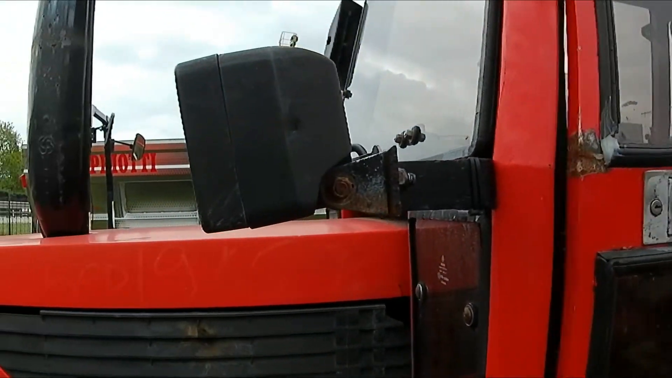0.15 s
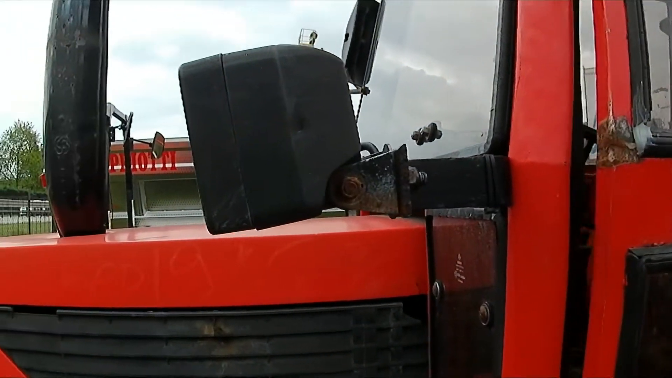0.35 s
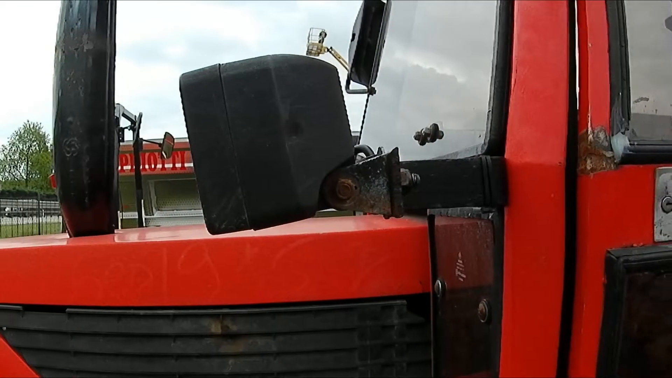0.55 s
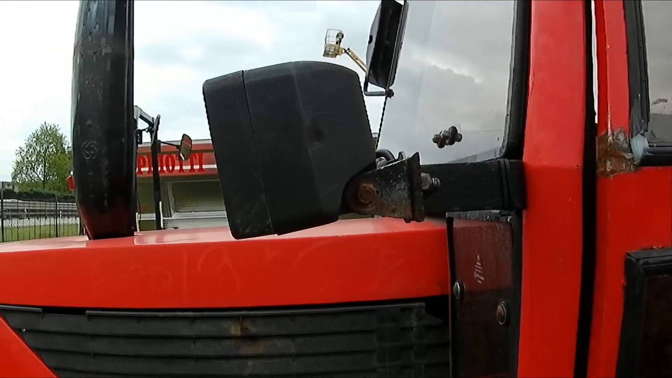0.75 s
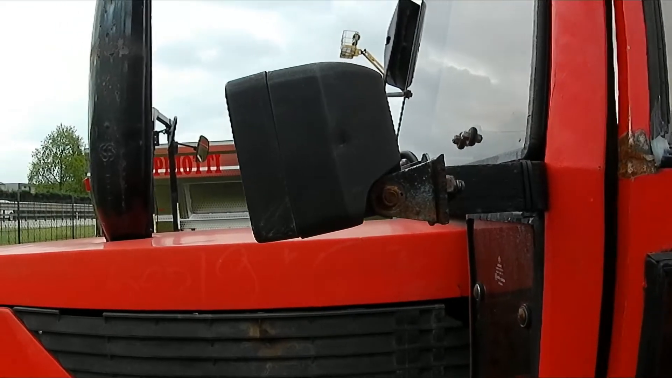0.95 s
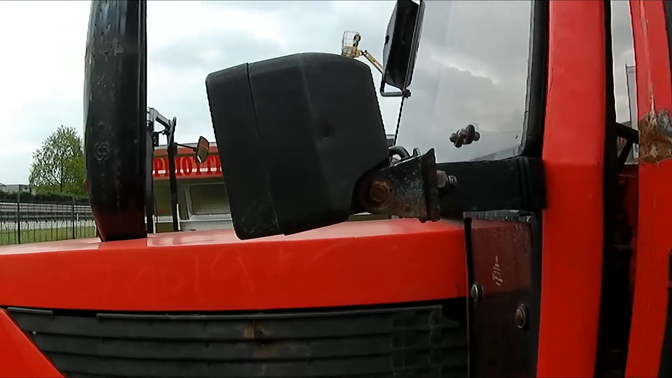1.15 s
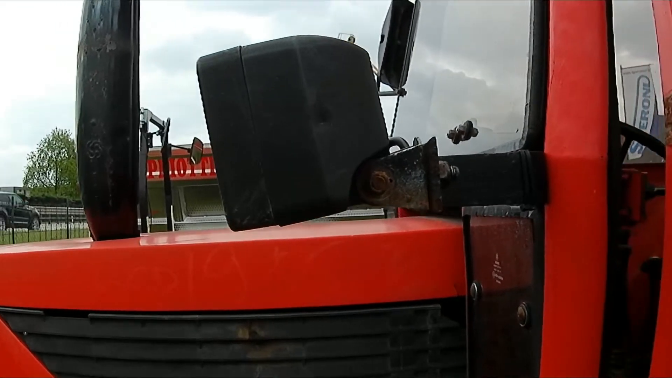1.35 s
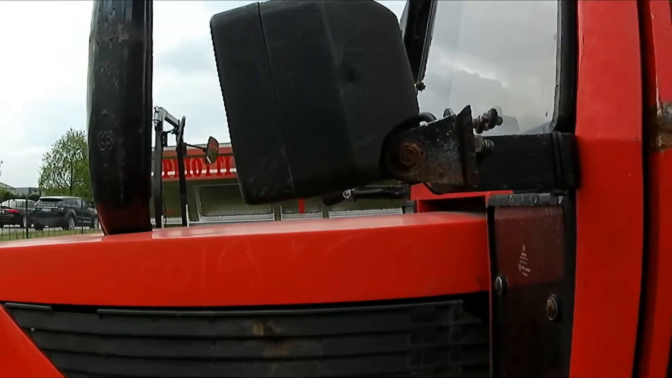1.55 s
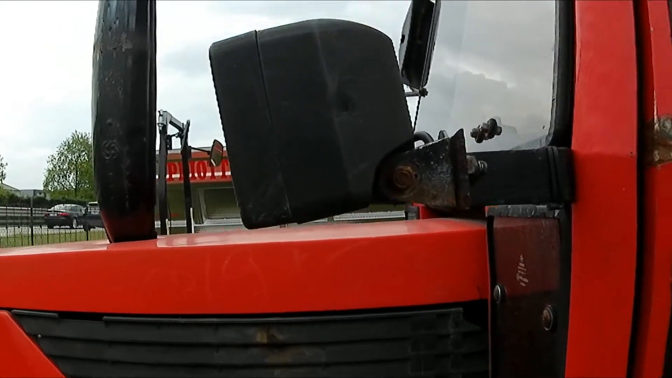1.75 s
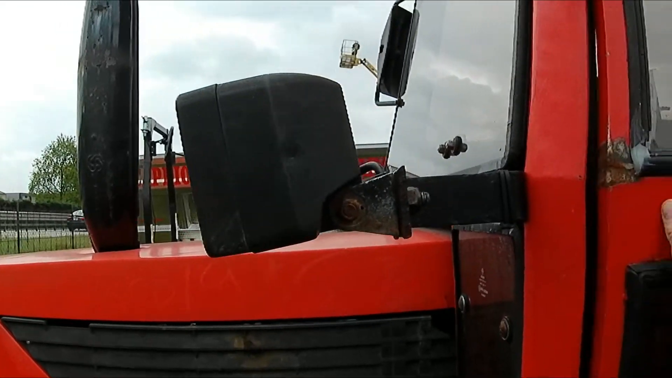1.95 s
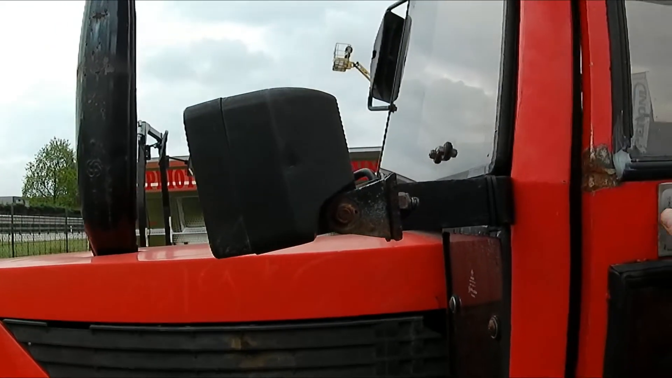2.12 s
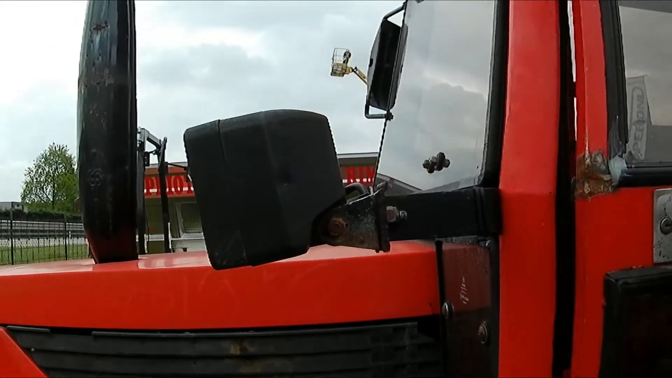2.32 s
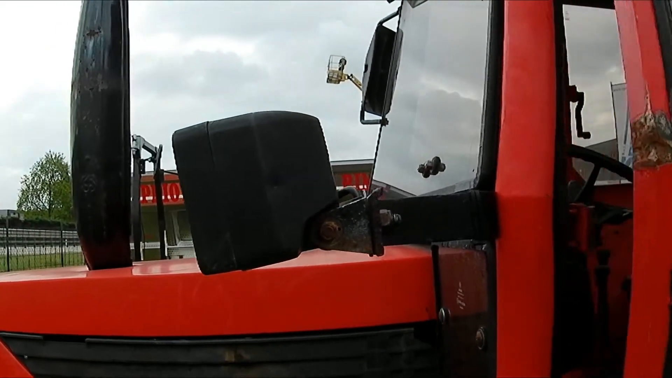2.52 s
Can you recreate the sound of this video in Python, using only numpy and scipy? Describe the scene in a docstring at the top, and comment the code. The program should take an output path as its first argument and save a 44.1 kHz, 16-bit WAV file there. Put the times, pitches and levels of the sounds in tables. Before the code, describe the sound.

Two sharp knocks hit a steel tractor cab, about a second and a half apart. Each clatters and booms, slightly overloading the close microphone, then the panels rattle and ring briefly. Distant road noise continues outdoors.

```python
"""Two knocks on a steel tractor cab, close by, over the steady noise of a road beyond the yard.
Each knock is a quick clatter of hard contacts on top of a deep boom of the panels that overloads
the microphone. Loose panels shudder, loose fittings buzz and the cab rings on for a moment.
Everything is heard twice, 17 ms apart, which makes the background sound hollow."""
import sys
import numpy as np
from scipy import signal
from scipy.fft import rfft, irfft
from scipy.io import wavfile
from scipy.ndimage import uniform_filter1d

SR = 44100
rng = np.random.default_rng(int(sys.argv[2]) if len(sys.argv) > 2 else 0)


def persist_wave(psi):
    """Save psi, clipped to +-1, as 16-bit WAV."""
    counts = np.round(np.clip(psi, -1, 1) * 32767).astype(np.int16)
    wavfile.write(sys.argv[1], SR, np.atleast_2d(counts).T)


N = 114660
T = np.arange(N) / SR
FILTER_HZ = np.linspace(0, SR / 2, 513)
DOUBLE_S = .017415  # gap between the two arrivals of every sound


def gain(db):
    """Turn decibels into a number to multiply by."""
    return 10 ** (np.asarray(db) / 20)


def unit(x):
    """Scale a signal so that its average strength (rms) is 1."""
    return x / np.sqrt(np.mean(x ** 2))


def look_up(hz, table, column=1):
    """Read a table between its rows, with frequency spaced in octaves."""
    table = np.array(table, float)
    return np.interp(np.log(np.maximum(hz, 1)), np.log(table[:, 0]), table[:, column])


def add(out, start, x):
    """Mix a sound in at a time in seconds."""
    i = int(start * SR)
    out[i:i + len(x)] += x[:N - i]


def octaves(hz):
    """Octaves above 1500 Hz, the middle of the steel's range; no lower than at 200 Hz."""
    return np.log2(np.maximum(hz, 200) / 1500)


def coloured_click(db):
    """A click with the given level at each frequency, packed toward its start (minimum phase)."""
    cepstrum = irfft(db * np.log(10) / 20)
    half = len(cepstrum) // 2
    cepstrum[1:half] *= 2
    cepstrum[half + 1:] = 0
    return irfft(np.exp(rfft(cepstrum)))


def fade(age, fade_s):
    """Die away by 60 dB in fade_s seconds, the 'fade time' of the tables."""
    return np.exp(-np.log(1000) * age / fade_s)


def struck_tones(table, seconds):
    """The fading tones that an object gives after one sharp tap."""
    t = T[:int(seconds * SR)]
    return sum(gain(db) * np.sin(2 * np.pi * hz * t) * fade(t, fade_s) for hz, db, fade_s in table)


def noise_bands(colour):
    """Noise shaped by a colour table and cut into half-octave bands: (centre in Hz, band)."""
    hz = np.arange(N // 2 + 1) * SR / N
    shape = gain(look_up(hz, colour)) * hz ** 2 / (hz ** 2 + 20 ** 2)  # weaker below 20 Hz
    spectrum = rfft(rng.standard_normal(N)) * unit(shape)
    centres = 25 * 2 ** (np.arange(20) / 2)
    return [(f, irfft(spectrum * np.maximum(1 - 2 * abs(np.log2((hz + 1) / f)), 0), N)) for f in centres]


def wander(per_s):
    """Random steps smoothed into a slow drift of size about 1."""
    hold = int(SR / per_s)
    steps = np.repeat(rng.standard_normal(N // hold + 1), hold)
    return unit(uniform_filter1d(uniform_filter1d(steps, hold), hold)[:N])


def doubled(x, early_db):
    """A sound with a weaker copy just ahead of it."""
    return x + gain(early_db) * np.roll(x, -round(DOUBLE_S * SR))


# The road's colour, or how strong its low and high parts are: f/Hz, level/dB
ROAD_COLOUR = [(20, -3), (38, 2.5), (57, 4), (80, -1), (115, -3), (172, -8.5), (230, -12), (345, -15),
               (460, -14.5), (690, -12), (920, -11.5), (1260, -16), (1800, -21.5), (2300, -28.5),
               (3000, -36), (4000, -43.5), (5000, -51), (6500, -55), (9000, -57.5), (15000, -62.5)]
# Centres of six ranges, from rumble to hiss: f/Hz
ROAD_RANGES = [100, 350, 680, 1100, 2000, 4000]
# How the road swells and sinks: t/s, then level/dB for each of the six ranges
ROAD_SWELLS = [(0, 7, 3, 7, 11, 4, 16), (.08, 3.5, 1, 12.5, 10, 7.5, 4.5), (.36, 7, -2.5, 5, 2, -2, 5),
               (.5, -1.5, 3.5, 4, 3.5, -0.5, 4), (.63, 1, -2.5, 2, -1.5, -1, 2),
               (.82, 3.5, 1.5, 1, 1, 4.5, 2.5), (1.0, 1, 6.5, 5, 3.5, 1, 2.5),
               (1.23, 5, 3.5, 6, 1.5, -2, -1.5), (1.48, 3.5, 4.5, 0, 2, 4, 0), (1.75, 7, 0, -5, -2, 2.5, 1),
               (2.0, -1.5, -3, -3.5, -1.5, -0.5, 1.5), (2.2, 0, -3, -5.5, 2.5, -2.5, 0),
               (2.33, 0.5, -2.5, -4, 1.5, 0.5, 1.5), (2.6, 1, -3, -4, -3.5, -2, 0)]


def road(level_db=-40, flicker_db=1.0):
    """Far traffic gives rumble and tyre noise, swelling slowly and flickering a little."""
    swells = np.array(ROAD_SWELLS)
    out = np.zeros(N)
    for hz, band in noise_bands(ROAD_COLOUR):
        band_db = [np.interp(np.log(hz), np.log(ROAD_RANGES), row) for row in swells[:, 1:]]
        swell_db = np.interp(T, swells[:, 0], band_db)
        out += doubled(band, early_db=-3.5) * gain(level_db + swell_db + flicker_db * wander(per_s=8.68))
    return out


# Hard contacts: t/s, level/dB, brightness/(dB per octave), tail length/s, resonance f/Hz
CONTACTS = [(.1268, -10, 4.5, 0.0042, 4230), (.1308, -1, -5, 0.0038, 1490), (.1336, -5.5, -1.5, 0.005, 810),
            (.1412, -5, -10.5, 0.0041, 590), (.1493, -8, -10, 0.0014, 1080), (.1520, -31, 4, 0.0022, 11500),
            (.1575, -12, 2, 0.0033, 2920), (1.5628, -16, 4.5, 0.0071, 2600), (1.5668, -3, 1, 0.0012, 3600),
            (1.5709, 2, -2, 0.002, 1330), (1.5730, -2.5, -7, 0.001, 1210), (1.5748, -7, -1, .001, 780),
            (1.5783, -13.5, -13, 0.00077, 980), (1.5893, -5.5, -5.5, 0.00064, 810),
            (1.6003, -6.5, -2, 0.0056, 2030), (1.6060, -14.5, -8.5, .004, 960)]
# The colour that all contacts share: f/Hz, level/dB
CONTACT_COLOUR = [(150, -2.5), (400, -4.5), (750, 3), (1300, 2), (2200, 0), (2900, -4), (4500, -11),
                  (6500, -19), (10000, -23.5), (16000, -37)]
# Short tones of the struck steel: f/Hz, level/dB, fade time/s
STEEL_TONES = [(757, -31, .03), (940, -52, 0.049), (1297, -21, 0.017), (1520, -16, 0.0097),
               (1980, -52, .02), (3080, -35, 0.025)]


def clatter(level_db=4.5, grit_db=3, resonance_db=4.5, resonance_octaves=0.28):
    """Each contact is a click with a gritty tail and its own resonance; it rings the steel briefly."""
    out, t = np.zeros(N), T[:2048]
    for start, db, brightness, tail_s, resonance_hz in CONTACTS:
        force = rng.standard_normal(len(t)) * np.sqrt(t) * np.exp(-2 * t / tail_s)
        force *= gain(grit_db) / np.linalg.norm(force)
        force[SR // 2500] += 1  # the click itself
        distance = (octaves(FILTER_HZ) - octaves(resonance_hz)) / resonance_octaves
        colour_db = look_up(FILTER_HZ, CONTACT_COLOUR) + brightness * octaves(FILTER_HZ)
        colour_db += resonance_db * np.exp(-distance ** 2)
        add(out, start, gain(level_db + db) * np.convolve(force, coloured_click(colour_db)))
    steel = signal.fftconvolve(out, struck_tones(STEEL_TONES, seconds=.1))[:N]
    return out + steel / 10


def push(length_s):
    """A soft pulse of force whose samples add up to 1."""
    t = T[:N // 20]
    pulse = t * np.exp(-2 * np.pi * t / length_s)
    return pulse / pulse.sum()


# Knocks: t/s, level/dB, push length/s, wait for rebound/s, rebound level/dB, rebound length/s
KNOCKS = [(.1095, 2.5, 0.006, .0315, 3, 0.0041), (1.5475, -3, 0.0038, .0325, 4, 0.0055)]
# Deep tones of the cab: f/Hz, level/dB, fade time/s
CAB_TONES = [(47.3, -19.5, 0.22), (59.3, -9, 0.16), (106.6, -26, 0.46), (127.3, -26, 0.85),
             (179.2, -25, 0.405), (232, -34.5, 0.23), (297, -20, 0.17), (399, -38, 0.9), (457, -37, 0.27),
             (490, -32, 0.17), (627, -23, 0.42), (787, -31, 0.32)]


def boom(level_db=-1):
    """Each knock pushes the panels in and they spring back, booming."""
    force = np.zeros(N)
    for start, db, push_s, wait_s, rebound_db, rebound_s in KNOCKS:
        arrival = start + DOUBLE_S  # the second, stronger arrival
        add(force, arrival, -gain(db) * push(push_s))
        add(force, arrival + wait_s, gain(rebound_db) * push(rebound_s))
    return signal.fftconvolve(force, struck_tones(CAB_TONES, seconds=1))[:N] * gain(level_db)


# Shudders of the loose panels: t/s, level/dB
SHUDDERS = [(0.127, -1.5), (1.596, 2)]
# Their colour: f/Hz, level/dB
SHUDDER_COLOUR = [(90, -8), (180, -1.5), (300, -2), (500, -5), (800, -17), (1300, -13.5), (3000, -50),
                  (16000, -67)]


def shudder(level_db=-21, rise_s=0.0075, fade_s=0.2):
    """Loose panels shake at each knock, making a short burst of low noise."""
    noise = sum(band for hz, band in noise_bands(SHUDDER_COLOUR))
    loudness = np.zeros(N)
    for start, db in SHUDDERS:
        age = np.maximum(T - start, 0)
        loudness += gain(level_db + db) * (1 - np.exp(-age / rise_s)) * fade(age, fade_s)
    return noise * loudness


# The cab's ringing after each knock: t/s, level/dB, brightness/(dB per octave)
RINGS = [(.131, 2.5, -1.5), (1.573, -0.5, -3.5)]
# Its colour and how long each part lasts: f/Hz, level/dB, fade time/s
RING_BANDS = [(40, -3.5, 0.66), (110, 1, 0.41), (256, -5.5, 0.48), (500, -4.5, .35), (960, -17.5, 0.29),
              (2080, -23.5, 0.72), (3860, -36, 0.68), (7700, -51.5, 0.67), (16000, -54, 0.9)]


def ringing(level_db=-26, rise_s=0.019):
    """The cab's many faint tones blur into noise and die away, each band at its own pace."""
    out = np.zeros(N)
    for hz, band in noise_bands(RING_BANDS):
        for start, db, brightness in RINGS:
            age = np.maximum(T - start, 0)
            loudness = (1 - np.exp(-age / rise_s)) * fade(age, look_up(hz, RING_BANDS, column=2))
            out += band * gain(level_db + db + brightness * octaves(hz)) * loudness
    return out


# Bursts of buzzing from loose fittings: middle t/s, level/dB, half length/s
BUZZES = [(0.132, -28, 0.011), (0.172, -47.5, 0.038), (1.572, -25, 0.0076), (1.603, -39, 0.011),
          (1.688, -53, 0.1)]
# Their colour: f/Hz, level/dB
BUZZ_COLOUR = [(300, -9), (1000, 5.5), (2500, -3.5), (4500, -12.5), (7000, -24.5), (15000, -28)]


def buzz(clicks_per_s=1500, spread_db=3.5):
    """Loose fittings buzz in dense, tiny clicks while the cab shakes."""
    clicks = (rng.random(N) < clicks_per_s / SR) * rng.choice([-1, 1], N)
    strengths = gain(spread_db * rng.standard_normal(N))
    one_click = coloured_click(look_up(FILTER_HZ, BUZZ_COLOUR))
    loudness = sum(gain(db) * np.exp(-((T - middle) / half_s) ** 2) for middle, db, half_s in BUZZES)
    return unit(signal.fftconvolve(clicks * strengths, one_click)[:N]) * loudness


def overload(x, ceiling):
    """Small swings pass through; big ones flatten softly under the ceiling."""
    return x / (1 + (x / ceiling) ** 6) ** (1 / 6)


def scene():
    """Knocks and road, each arriving twice; the cab's deep swings flatten in the microphone."""
    body = overload(boom() + shudder() + ringing(), ceiling=.25)
    clicks = clatter() + buzz()
    return (doubled(clicks, early_db=-13.5) + doubled(body, early_db=-3.5) + road())[None]


def record(dry, top_hz=15750):
    """Round off the tallest peaks and cut the highest treble."""
    treble_cut = signal.ellip(10, .1, 80, top_hz, fs=SR, output="sos")
    return signal.sosfilt(treble_cut, overload(dry, ceiling=.72))


dry = scene()
out = record(dry)
persist_wave(out)
```